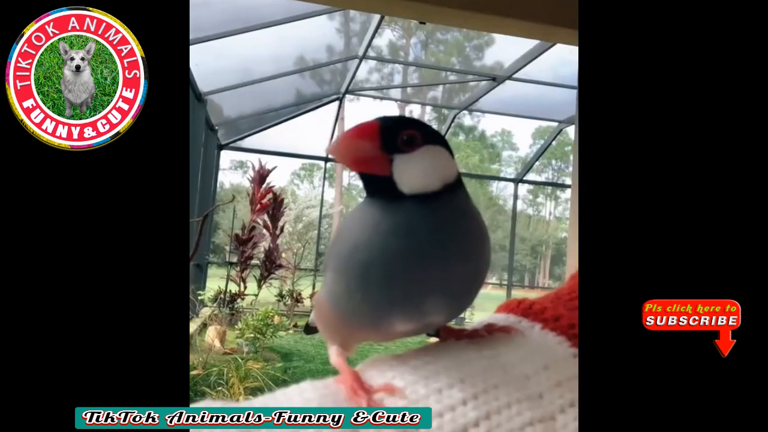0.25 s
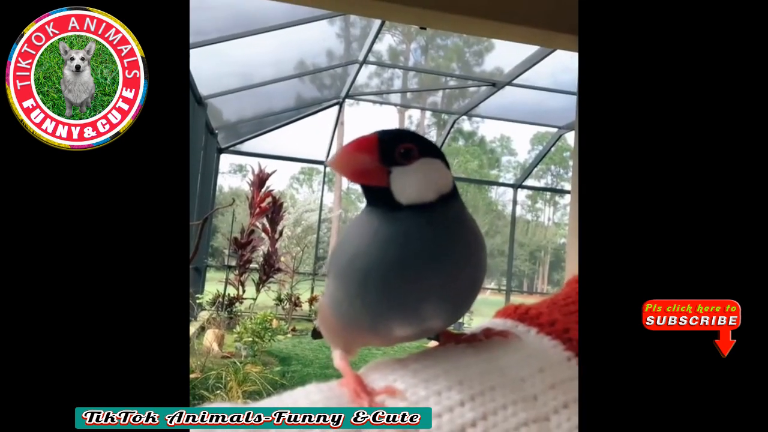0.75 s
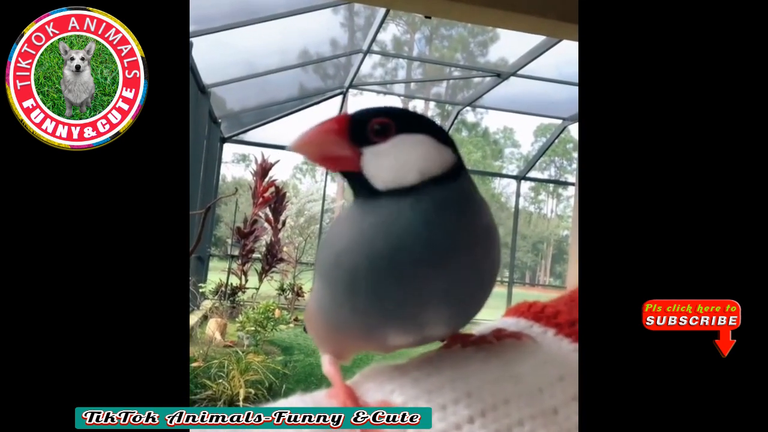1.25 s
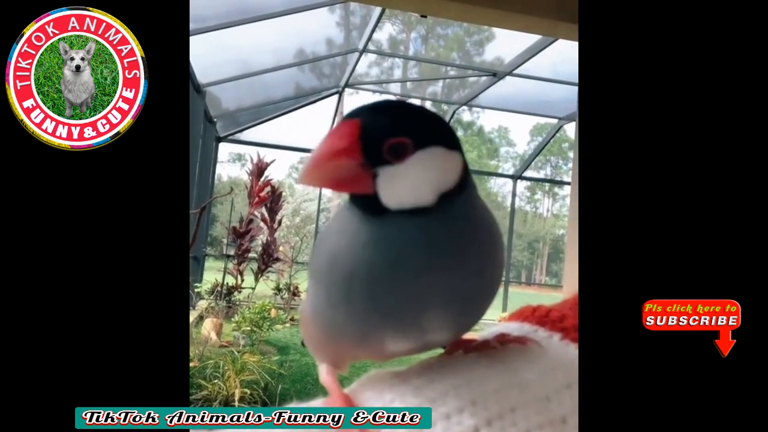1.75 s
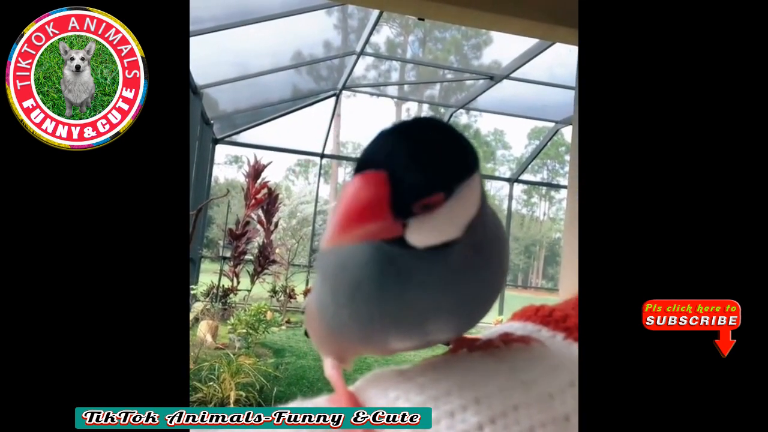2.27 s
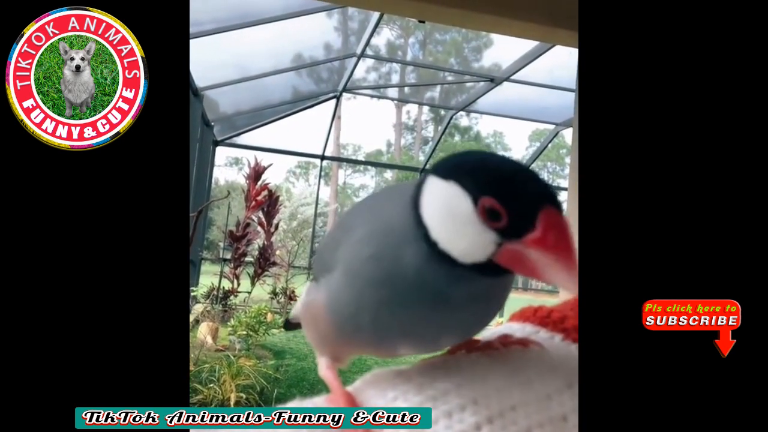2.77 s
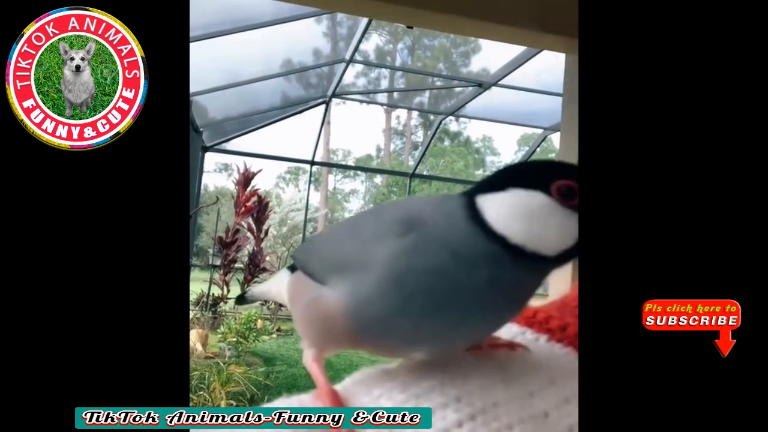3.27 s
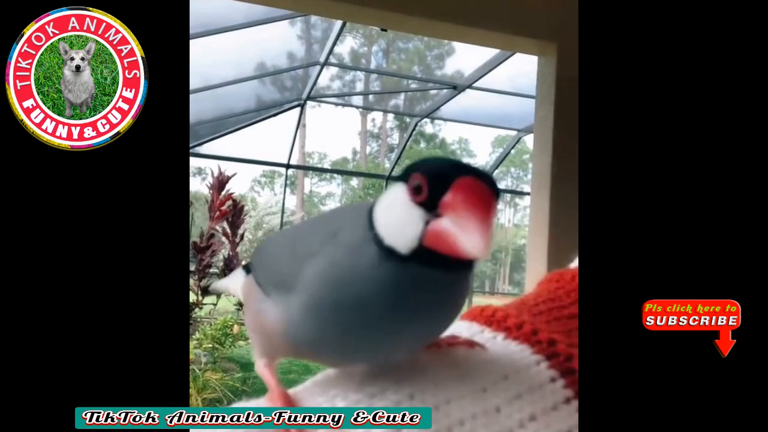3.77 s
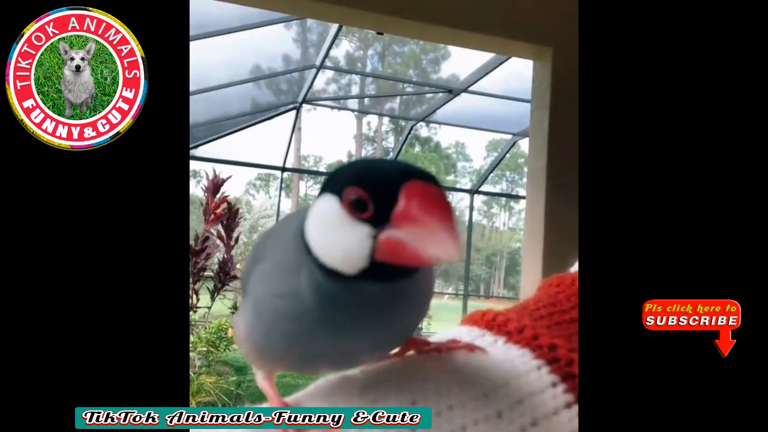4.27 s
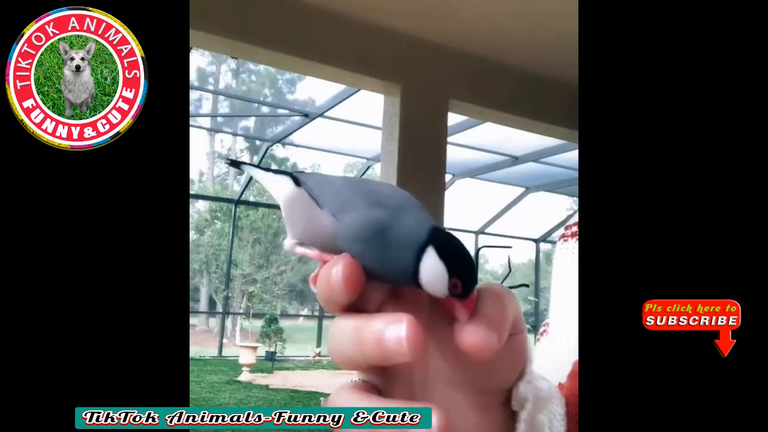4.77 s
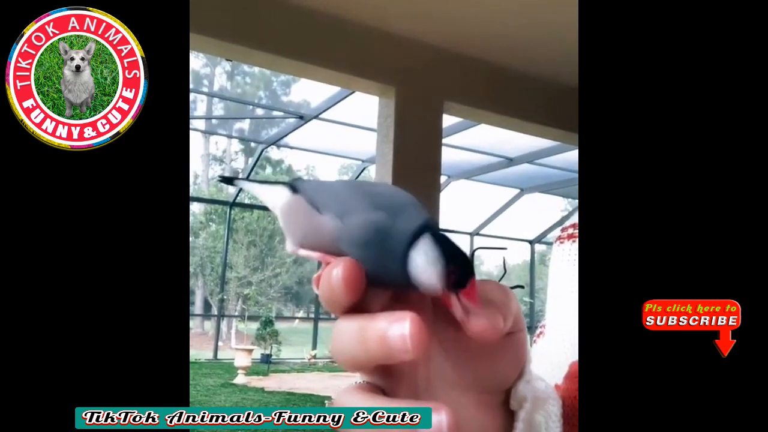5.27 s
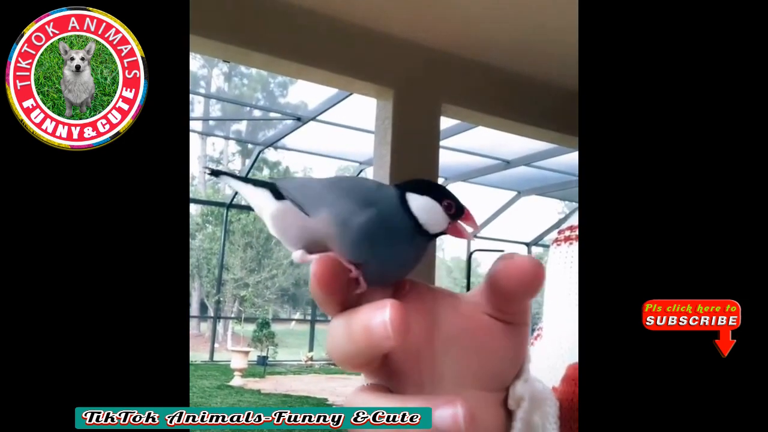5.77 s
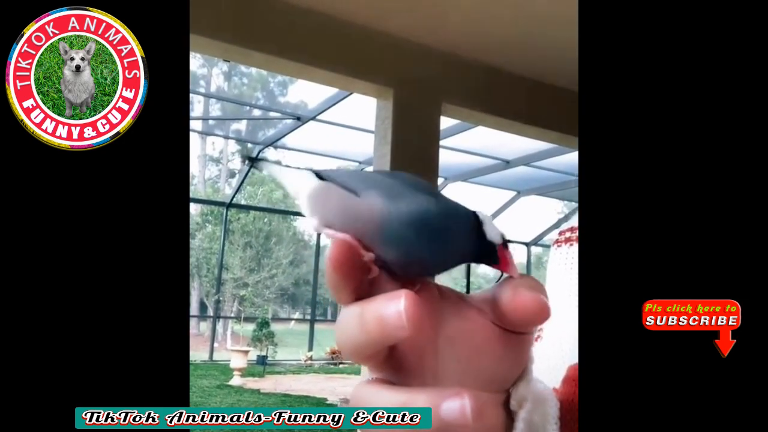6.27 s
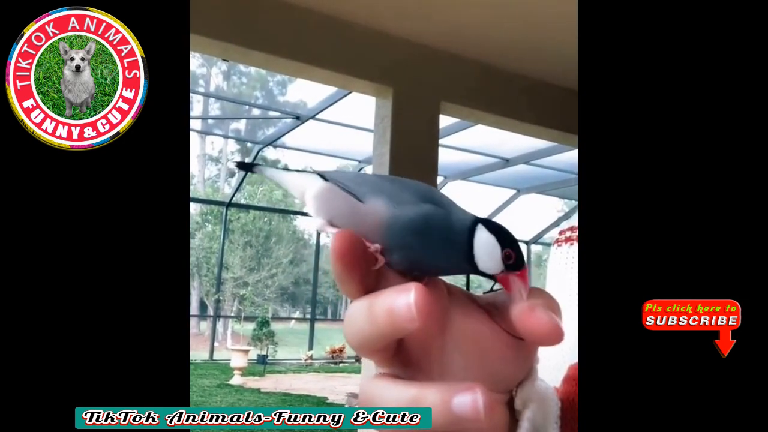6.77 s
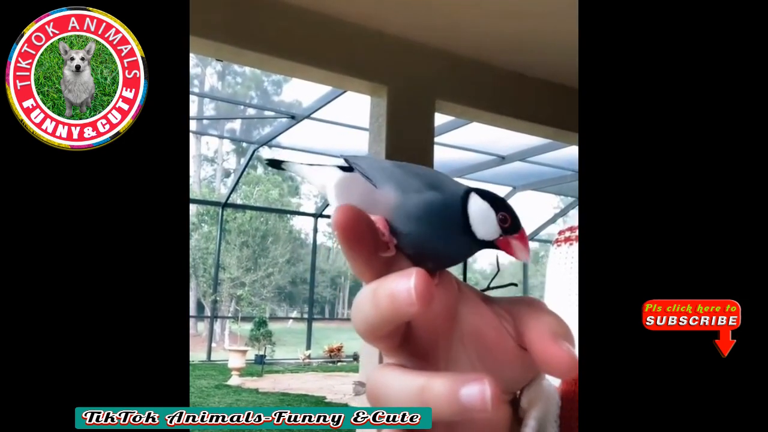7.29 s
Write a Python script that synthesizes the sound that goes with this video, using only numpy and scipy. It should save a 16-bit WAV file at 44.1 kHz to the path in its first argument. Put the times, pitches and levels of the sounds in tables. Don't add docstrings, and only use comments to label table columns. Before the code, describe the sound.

Soft rumbling outdoor air opens with a faint peep, broken by two tiny silences around 0.1 to 0.2 s. A high, hissy cicada drone then fills the trees, with sparse faint peeps until 1.5 s. From 1.5 to 2.9 s a distant bird warbles evenly, about ten wavering notes a second near 2.5 kHz. Three soft, raspy buzzed calls follow at 3.0, 3.4 and 3.8 s. A very short silence at 4.5 s marks a change: a quick bird swoop, low traffic thrum and a wavering far engine hum, with brighter cicadas swelling towards 6 s. At 5.6 s a close finch gives one loud, harsh, rattling squawk of under 0.2 s, ringing in the porch. From 6.2 to 7.5 s ten short whistled chirps slide steeply downward, roughly every 0.13 s, echoing off the house, with tiny high swoops between. Phone sound, slightly thinned treble.

```python
import sys
import numpy as np
from scipy import signal
from scipy.fft import rfft, irfft
from scipy.io import wavfile
from scipy.ndimage import uniform_filter1d

SR = 44100
rng = np.random.default_rng(int(sys.argv[2]) if len(sys.argv) > 2 else 0)


def rack_gain(trim_db):
    fader = np.asarray(trim_db, float)
    return 10 ** (fader / 20)


def waveform_to_disk(signal):
    frames = np.transpose(np.atleast_2d(signal))
    scaled = np.clip(frames, -1, 1) * 32767
    samples = np.round(scaled).astype(np.int16)
    wavfile.write(sys.argv[1], SR, samples)


N = 332073
TIME = np.arange(N) / SR
SCENE_CHANGE_S = 4.5


def colour(x, points):
    hz, db = np.transpose(points)
    bins_hz = np.fft.rfftfreq(len(x), 1 / SR)
    gain_db = np.interp(np.log(bins_hz + 1), np.log(hz), db)
    y = irfft(rfft(x) * rack_gain(gain_db), len(x))
    return y / np.std(y)


def walk(rate, size=N):
    hold = int(SR / rate)
    levels = np.repeat(rng.standard_normal(size // hold + 1), hold)
    return uniform_filter1d(levels, hold)[:size]


def curve(table):
    s, *columns = np.transpose(table)
    return [np.interp(TIME, s, column) for column in columns]


def tone(hz):
    return np.sqrt(2) * np.sin(2 * np.pi * np.cumsum(hz) / SR)


def glide(length_s, first, last):
    return np.linspace(first, last, int(length_s * SR))


def add(out, start_s, note):
    i = int(start_s * SR)
    out[i:i + len(note)] += note[:N - i]


# pitch in Hz, level in dB.
SOFT_WALLS = [(20, -2), (2800, -2), (4000, 0), (8000, -4), (11000, -13), (14000, -22)]


def echo(x, t60_s, wet_db, onset_s, wall_db):
    t = np.arange(SR) / SR
    wall = np.exp(-((t - .058) / .014) ** 2)
    shape_db = -60 * t / t60_s + wall_db * wall + 3.0 * walk(150, size=SR)
    tail = colour(rng.standard_normal(SR), SOFT_WALLS) * rack_gain(shape_db)
    tail = tail * np.clip(t / onset_s, 0, 1)
    tail = tail / np.sqrt(np.sum(tail ** 2))
    return x + rack_gain(wet_db) * signal.fftconvolve(x, tail)[:N]


def whistles(notes, edge, lean, rough, waver):
    out = np.zeros(N)
    for start, hz, db in notes:
        u = np.linspace(0, 1, len(hz))
        hz = hz * (1 + waver * walk(181.4, size=len(u)))
        swell = np.sin(np.pi * u ** lean).clip(0) ** edge
        add(out, start, rack_gain(db) * swell * tone(hz))
    return out * rack_gain(rough * walk(140))


# time in seconds, upper voice in Hz, its level in dB, lower voice level in dB.
SQUAWK = [(5.614, 4440, -68, -61), (5.644, 4470, -23.5, -37), (5.67, 4305, -27, -44),
          (5.692, 4255, -40, -39.5), (5.71, 4190, -20.5, -25.5), (5.724, 4015, -31, -59),
          (5.742, 3846, -23, -59), (5.765, 3916, -34, -53), (5.81, 3780, -62, -75)]
# pitch in Hz, level in dB per Hz.
BEAK = [(1060, -69), (1800, -31), (2390, -16), (2980, -8), (3530, -12), (4220, -15), (4990, -9.5),
        (8890, -11.5), (9800, -16), (11800, -21), (15000, -56)]
# time in seconds, rattle rate in Hz.
RATTLE = [(5.62, 107.4), (5.70, 120.8), (5.73, 171.6), (5.8, 194)]


def squawk():
    upper, upper_db, lower_db = curve(SQUAWK)
    since = np.clip(TIME - SQUAWK[0][0], 0, 1)
    lower = 3027 + (2300 - 3027) * np.exp(-since / .014)
    upper = upper * (1 + .021 * walk(450))
    lower = lower * (1 + .02 * walk(250))

    beak_ring = 1 / (1 + ((3 * upper - 11500) / 700) ** 2)
    high = tone(upper) + rack_gain(-7.5) * tone(2 * upper)
    high = high + rack_gain(-11) * beak_ring * tone(3 * upper) + rack_gain(-35) * tone(4 * upper)
    low = tone(lower) + rack_gain(-7.0) * (tone(3 * lower) + tone(upper + lower) + tone(2 * upper - lower))

    attack = (1 - since / 0.015).clip(0)
    release = ((TIME - 5.765) / 0.04).clip(0, 3)
    breath_db = -31.5 - 30 * since - 30 * (attack + release)
    breath = colour(rng.standard_normal(N), BEAK)

    rate, = curve(RATTLE)
    rattle = rack_gain(3.2 * tone(rate * (1 + .15 * walk(80))) + 2.0 * walk(150))
    sounding = (TIME > SQUAWK[0][0]) & (TIME < SQUAWK[-1][0])
    voices = rack_gain(upper_db) * high + rack_gain(lower_db) * low + rack_gain(breath_db) * breath
    return echo(sounding * rattle * voices, t60_s=0.54, wet_db=-2.5, onset_s=0.005, wall_db=0)


# end in seconds, length in seconds, entry pitch in Hz,
# bend (over 1 drops early), level in dB.
CHIRPS = [(6.287, .075, 5370, 1.5, -47.5), (6.461, 0.053, 4950, 0.88, -40), (6.596, .032, 3600, .75, -40.5),
          (6.729, 0.056, 5700, 1.2, -38.5), (6.857, 0.058, 5800, 1.3, -38.5),
          (6.984, .048, 5400, 1.11, -37), (7.122, .039, 4450, .8, -39), (7.252, .038, 4400, 1.04, -40),
          (7.4, .037, 4190, .8, -38), (7.534, .035, 4300, .85, -38)]
# seconds before the end, pitch in Hz.
FALL = [(0, 2236), (0.019, 3380), (.035, 4245), (.048, 5300), (0.061, 5950)]
# pitch in Hz, level in dB.
HEDGE = [(1800, -5), (2400, -3), (3000, -0.5), (3500, -0.5), (4100, 1), (4450, -7.5), (4800, -3.5),
         (5200, -11), (5700, -8), (6500, -15)]


def chirp_notes():
    before, slope_hz = np.transpose(FALL)
    notes = []
    for end, length, entry_hz, bend, db in CHIRPS:
        entry = np.interp(entry_hz, slope_hz, before)
        left = entry * glide(length, 0.99, 0) ** bend
        notes.append((end - length, np.interp(left, before, slope_hz), db))
    return notes


def chirps():
    heard = np.zeros(N)
    for k in range(2):
        side = whistles(chirp_notes()[k::2], edge=.45, lean=.43, rough=3.0, waver=.01)
        heard += echo(side, t60_s=0.37, wet_db=-4.5, onset_s=0.0054, wall_db=3)
    return colour(heard, HEDGE) * rack_gain(-50.0)


# start in seconds, pitch in Hz, rise in Hz, level in dB.
WARBLE = [(1.535, 2473, 190, -46.5), (1.625, 2496, 60, -48), (1.71, 2500, 107, -46),
          (1.80, 2513, -40, -44.5), (1.885, 2587, 20, -48.5), (1.986, 2566, -60, -46),
          (2.084, 2480, -180, -45.5), (2.18, 2500, -88, -45.5), (2.286, 2500, 90, -44),
          (2.385, 2578, 150, -47), (2.491, 2500, -50, -46), (2.565, 2590, 100, -46.5),
          (2.639, 2640, -60, -46.5), (2.691, 2474, -42, -46.5), (2.79, 2530, 38, -48.5),
          (2.91, 2540, 10, -73)]


def warble():
    waits = np.diff([note[0] for note in WARBLE], append=np.inf)
    notes = []
    for (start, hz, rise, db), wait in zip(WARBLE, waits):
        length = min(0.85 * wait, 0.092)
        notes.append((start, glide(length, hz - rise / 2, hz + rise / 2), db))
    sung = whistles(notes, edge=1.3, lean=.75, rough=3.2, waver=.024)
    return echo(sung, t60_s=0.37, wet_db=-7.0, onset_s=0.011, wall_db=0)


# start in seconds, length in seconds, first pitch in Hz, last pitch in Hz, level in dB.
SWOOPS = [(4.516, 0.019, 4460, 2490, -45.5), (4.533, .03, 2550, 2960, -44.5),
          (4.554, .055, 2940, 2850, -44.5), (5.447, 0.0136, 2270, 4600, -52),
          (5.455, .012, 4600, 5000, -39.5), (6.549, 0.016, 4850, 3550, -47),
          (6.404, 0.009, 4960, 4750, -48), (6.794, .012, 5780, 5600, -51), (7.19, .029, 6000, 4500, -46.5),
          (7.465, .032, 5650, 4500, -49)]


def swoops():
    notes = [(start, glide(length, first, last), db) for start, length, first, last, db in SWOOPS]
    sung = whistles(notes, edge=.4, lean=.8, rough=1.2, waver=.006)
    return echo(sung, t60_s=0.38, wet_db=-3.5, onset_s=0.0069, wall_db=0)


# start in seconds, length in seconds, first pitch in Hz, last pitch in Hz, level in dB.
BUZZES = [(3.024, 0.23, 3485, 3046, -52), (3.423, 0.26, 2750, 2960, -53), (3.832, .2, 2867, 2387, -52)]
# start in seconds, length in seconds, first pitch in Hz, level in dB.
TAILS = [(3.185, .1, 2270, -66), (3.99, .2, 2260, -61)]


def buzzes():
    out = np.zeros(N)
    notes = [(s, length, first, last, 0.167 * first, db) for s, length, first, last, db in BUZZES]
    notes += [(s, length, hz, hz * (1 - .15), 160, db) for s, length, hz, db in TAILS]
    for start, length, first, last, swing_hz, db in notes:
        u = np.linspace(0, 1, int(length * SR))
        cycle = np.cumsum(111 * (1 + .25 * walk(90, size=len(u)))) / SR % 1
        sweep = np.cos(np.pi * cycle) + .3 * walk(500, size=len(u))
        hz = first + (last - first) * u + swing_hz * sweep
        rasp = np.sin(np.pi * cycle) ** .25 * rack_gain(3.0 * walk(250, size=len(u)))
        swell = np.sin(np.pi * u ** .5).clip(0) ** .5
        add(out, start, rack_gain(db) * swell * rasp * tone(hz))
    return echo(out, t60_s=0.31, wet_db=2.8, onset_s=0.0032, wall_db=0)


# start in seconds, length in seconds, first pitch in Hz, last pitch in Hz, level in dB.
PEEPS = [(0, .037, 3470, 3470, -62), (0.075, 0.029, 4260, 2970, -55), (0.328, .03, 2400, 2570, -61),
         (0.522, 0.033, 2700, 2520, -59), (0.688, 0.058, 2500, 2890, -58), (0.687, 0.052, 3750, 3400, -60),
         (.86, .05, 2590, 2380, -64), (0.997, .05, 2990, 3210, -57.5), (1.111, 0.055, 2410, 3080, -55),
         (1.264, .039, 2800, 2730, -57), (1.391, .03, 2500, 2460, -63), (2.572, 0.063, 1700, 1740, -56.5),
         (2.733, .028, 1720, 1480, -50.5), (2.725, .045, 2850, 3350, -58), (4.426, 0.041, 3590, 4200, -56),
         (4.44, .05, 2880, 3080, -62), (6.04, 0.049, 2536, 2424, -52), (6.269, .035, 2470, 2340, -49)]
# start in seconds, length in seconds, low pitch in Hz, high pitch in Hz, level in dB.
PAIRS = [(0.218, 0.032, 1700, 3420, -57), (4.665, .23, 1980, 2390, -62.5), (4.99, 0.223, 1980, 2420, -60)]


def peeps():
    notes = [(start, glide(length, first, last), db) for start, length, first, last, db in PEEPS]
    for start, length, low, high, db in PAIRS:
        sag = glide(length, 0.99, 1 - 0.044)
        notes += [(start, low * sag, db), (start, high * sag, db)]
    sung = whistles(notes, edge=.5, lean=.6, rough=3.2, waver=.032)
    return echo(sung, t60_s=0.3, wet_db=1.0, onset_s=0.0029, wall_db=0)


# pitch in Hz, level in dB.
TYMBAL = [
    [(2000, -50), (3300, -18), (3750, -13.5), (4220, -7), (4690, -13), (5160, -9), (5625, -6), (6090, -6.5), (6560, -3.5), (7030, -6.5), (7970, -2), (8440, -6.5), (9100, -16.5), (11000, -18.5), (14000, -54)],
    [(3060, -75), (5200, -9), (6590, -2), (7040, -7), (7400, 1), (8200, -10.5), (8870, -11), (10300, -52), (14000, -38)],
]


def cicada(click_hz, throb_hz, tymbal, size, weak_db, side_db, top_hz):
    hz, db = np.transpose(tymbal)
    click_pitch = click_hz * (1 + 0.000492 * walk(5, size=size))
    throb_pitch = throb_hz * (1 + .012 * walk(3.58, size=size))
    click = np.exp(2j * np.pi * np.cumsum(click_pitch) / SR).astype(np.complex64)
    throb = np.exp(2j * np.pi * np.cumsum(throb_pitch) / SR).astype(np.complex64)
    lowest = int(hz[1] / click_hz)
    out, line = 0, click ** lowest
    for k in range(lowest + 1, int(top_hz / click_hz)):
        line = line * click
        fade = np.interp(np.arange(size), np.linspace(0, size, 9), rng.standard_normal(9))
        sizes = rack_gain((1.0, 3.0, 3.0) * rng.standard_normal(3))
        main, above, below = sizes * np.exp(2j * np.pi * rng.random(3))
        sides = rack_gain(side_db) * (complex(above) * throb + complex(below) * throb.conj())
        gain = rack_gain(np.interp(k * click_hz, hz, db) + weak_db * (k % 2))
        out = out + gain * (line * (complex(main) + sides)).real * (1 + .36 * fade)
    return out / np.std(out)


# time in seconds, level in dB.
CHORUS = [(0, -43), (.4, -43), (2.4, -42), (3.15, -39.5), (4.49, -46.5), (4.52, -40.5), (4.9, -38.5),
          (5.5, -35), (6.1, -34.5), (6.8, -35.5), (7.53, -39)]


def cicadas(chorus_db):
    cut = int(SCENE_CHANGE_S * SR)
    first = cicada(234.35, 86.3, TYMBAL[0], size=cut, weak_db=-9.0, side_db=-10.0, top_hz=15400)
    second = cicada(245.1, 88.5, TYMBAL[1], size=N - cut, weak_db=-4.5, side_db=-16.0, top_hz=11000)
    return np.concatenate((first * rack_gain(-4.0), second * rack_gain(-11.5))) * rack_gain(chorus_db)


# pitch in Hz, level in dB per Hz.
AIR = [
    [(12, -38), (20, -14.5), (74, 0.5), (196, -3.5), (274, -3.5), (427, -18.5), (2090, -30), (2540, -32), (2920, -34.5), (4190, -31), (4950, -35.5), (7730, -25.5), (11100, -34.5), (12800, -55), (15500, -74)],
    [(12, -37), (20, -4), (95, 0), (185, -8.5), (282, -2), (352, -16), (519, -23), (811, -19.5), (985, -24.5), (3450, -33.5), (4310, -27), (4950, -32), (7110, -22), (9130, -35), (15500, -66)],
]


def outdoor_air(chorus_db):
    cut = int(SCENE_CHANGE_S * SR)
    first = colour(rng.standard_normal(cut), AIR[0]) * rack_gain(-39)
    second = colour(rng.standard_normal(N - cut), AIR[1]) * rack_gain(-38)
    air = np.concatenate((first, second)) * rack_gain(1.0 * walk(3.05))
    treble = signal.butter(2, 5000, "high", fs=SR, output="sos")
    hiss = signal.sosfiltfilt(treble, air)
    return air + hiss * (rack_gain(0.22 * (chorus_db + 45)) - 1)


# pitch in Hz, level in dB per Hz.
OPENING = [(12, -41), (20, -12), (80, -4), (112, -4.5), (245, -23.5), (416, -25.5), (2920, -45),
           (3450, -31), (7310, -30), (15500, -60)]


def garden():
    chorus_db, = curve(CHORUS)
    opening = colour(rng.standard_normal(N), OPENING) * rack_gain(-40.5)
    return np.where(TIME < 0.14, opening, cicadas(chorus_db) + outdoor_air(chorus_db))


# time in seconds, sixth order in Hz, level in dB.
ENGINE = [(4.52, 288, -41.5), (5.16, 287, -39), (5.6, 305, -42), (6.06, 306, -42), (6.45, 282, -58),
          (6.68, 288, -37.5), (7.53, 292, -45.5)]
# order, level in dB.
ENGINE_ORDERS = [(3, -8), (4, -8), (5, -8), (6, -1.5)]


def engine():
    hz, db = curve(ENGINE)
    out = np.zeros(N)
    for order, order_db in ENGINE_ORDERS:
        level = rack_gain(order_db + 2.44 * walk(12))
        out += level * tone(hz * order / 6 * (1 + 0.01282 * walk(20)))
    return rack_gain(db) * out


# start
# in seconds, end in seconds, pitch in Hz, level in dB.
THRUM = [(4.503, 5.27, 104.8, -39), (5.197, 6.255, 94.5, -43), (6.333, 6.713, 110.2, -36.5),
         (6.686, 7.7, 93, -41), (4.75, 5.25, 141.2, -43), (7.15, 7.7, 130, -43)]


def traffic():
    waver = 1 + 0.016 * walk(11)
    out = np.zeros(N)
    for start, end, hz, db in THRUM:
        fade = np.clip(np.minimum(TIME - start, end - TIME) / .12, 0, 1)
        out += rack_gain(db) * fade * tone(hz * waver)
    return rack_gain(2.4 * walk(10)) * out


def scene():
    birds = squawk() + chirps() + warble() + swoops() + buzzes() + peeps()
    road = (TIME > SCENE_CHANGE_S) * (engine() + traffic())
    return (birds + garden() + road)[None]


def thin_treble(x, from_hz, under_db, faint_db, patchy_db):
    hz, _, z = signal.stft(x, SR, nperseg=1024)
    power = uniform_filter1d(abs(z) ** 2, size=12, axis=0)
    power = uniform_filter1d(power, size=2, axis=1)
    middle = power[(hz > 3000) & (hz < 9500)].mean(axis=0)
    luck = rng.standard_exponential((len(hz) // 8 + 1, z.shape[1] // 3 + 1))
    luck = np.repeat(luck, 8, axis=0)[:len(hz)]
    luck = np.repeat(luck, 3, axis=1)[:, :z.shape[1]]
    limit = np.maximum(middle * rack_gain(2 * under_db), rack_gain(2 * faint_db)) * rack_gain(-2 * patchy_db * luck)
    kept = (hz[:, None] < from_hz) | (power > limit)
    return signal.istft(z * kept, SR, nperseg=1024)[1][:N]


# start in seconds, end in seconds.
GAPS = [
    (.1075, .1540),
    (.1625, .2262),
    (4.4785, 4.5190),
]


def silences():
    gate = np.ones(N)
    for start, end in GAPS:
        gate[int(start * SR):int(end * SR)] = 0
    since = TIME - GAPS[0][0]
    trace = rack_gain(-40) * np.clip(1 - since / .028, 0, 1) * (since > 0)
    return uniform_filter1d(gate, size=40) + trace


def band_limit(x):
    return signal.sosfilt(signal.butter(12, 15670, fs=SR, output="sos"), x)


def record(dry):
    thinned = thin_treble(dry[0], from_hz=11200, under_db=-33, faint_db=-94, patchy_db=10.0)[None]
    mix = thinned * silences()
    return band_limit(mix)


dry = scene()
out = record(dry)
waveform_to_disk(out)
```